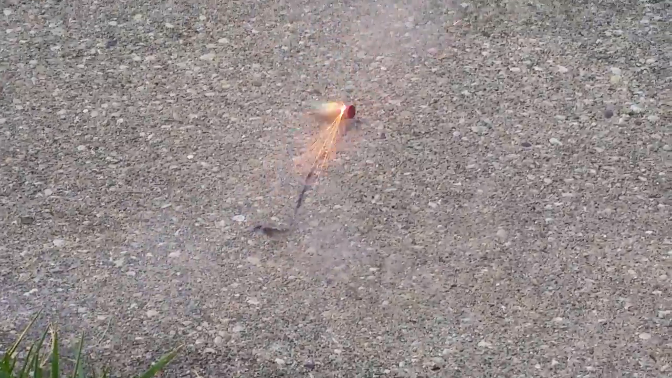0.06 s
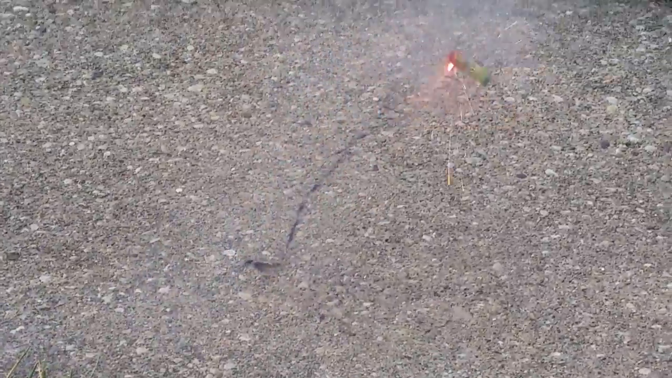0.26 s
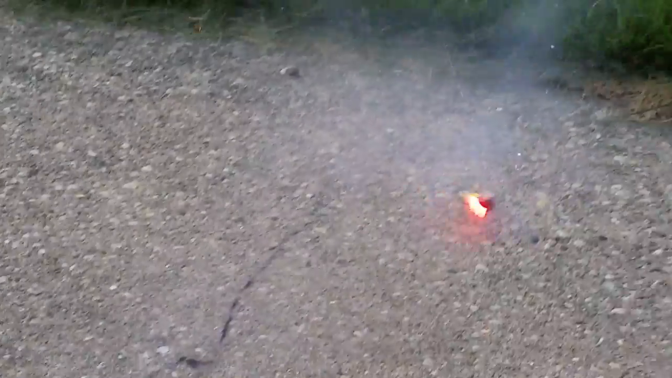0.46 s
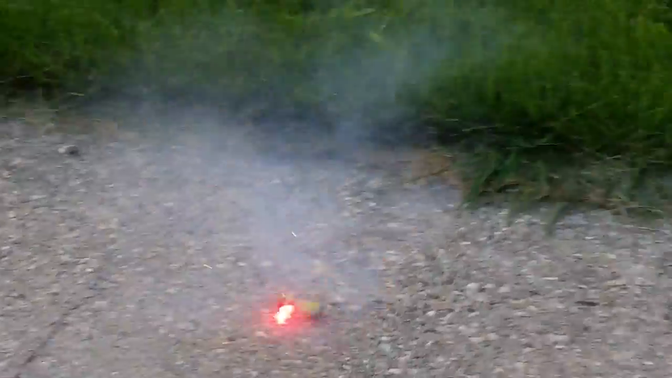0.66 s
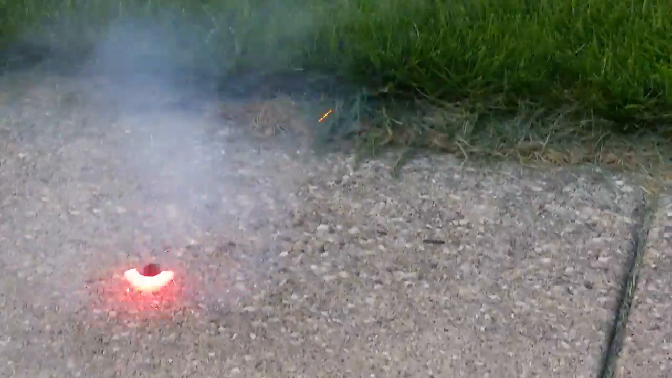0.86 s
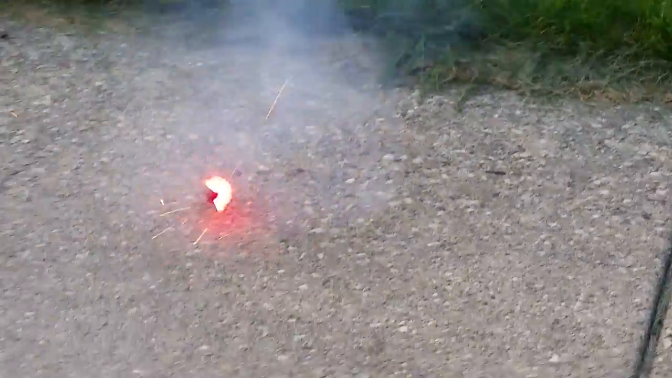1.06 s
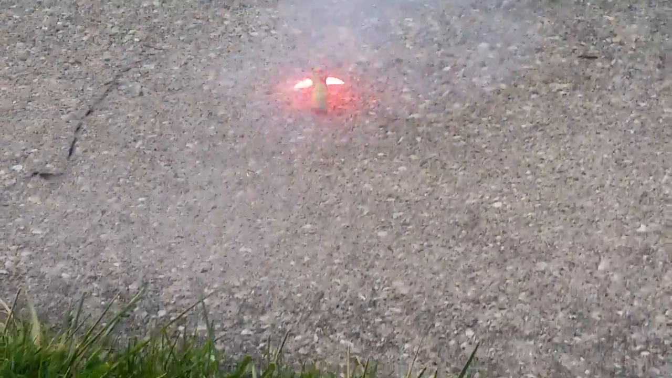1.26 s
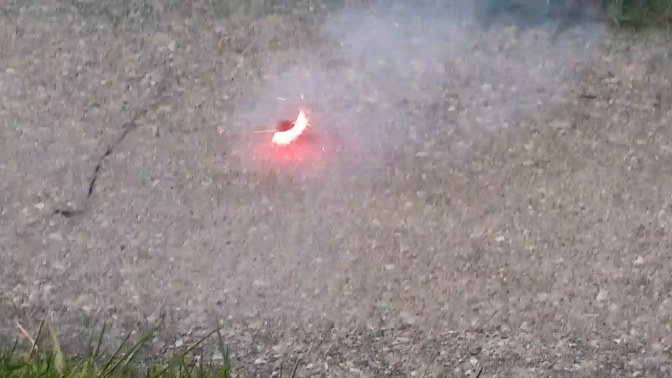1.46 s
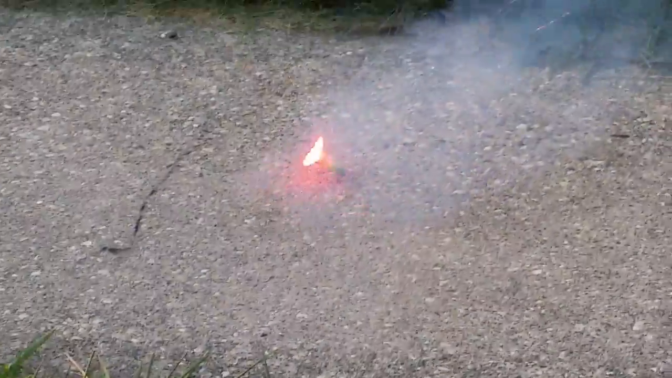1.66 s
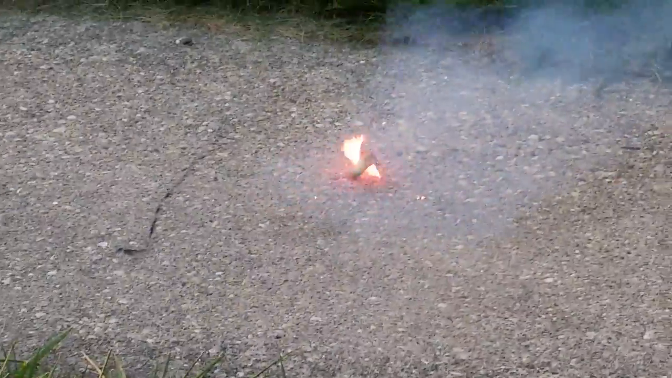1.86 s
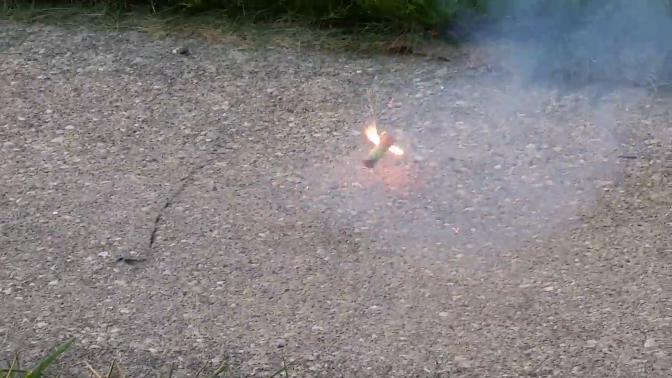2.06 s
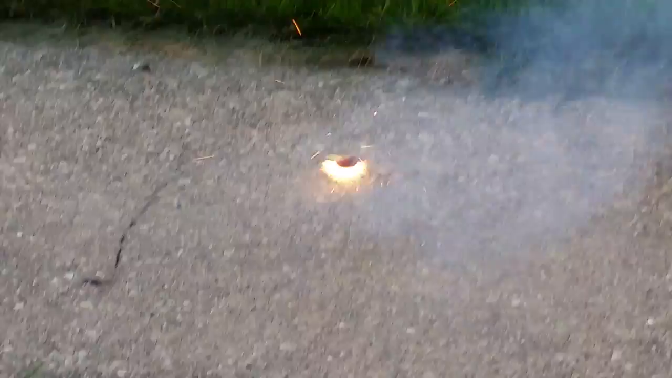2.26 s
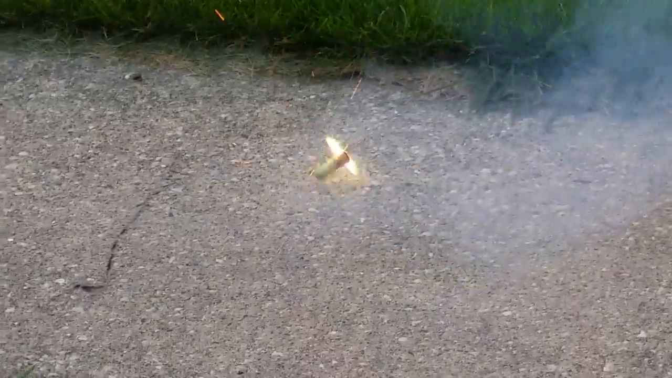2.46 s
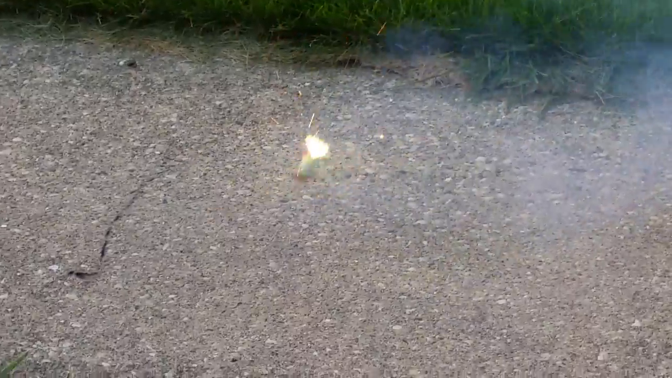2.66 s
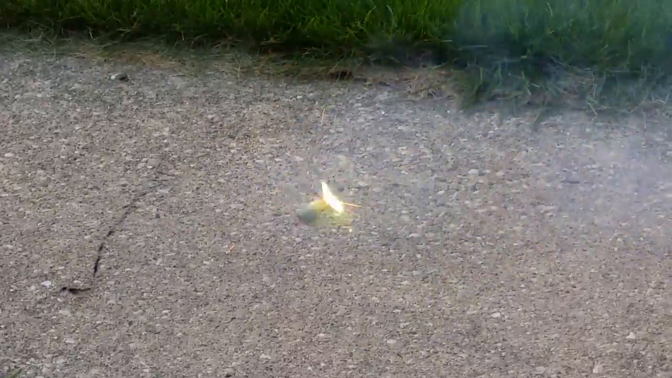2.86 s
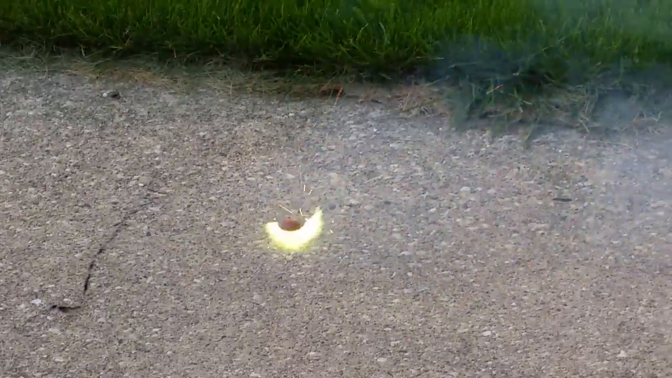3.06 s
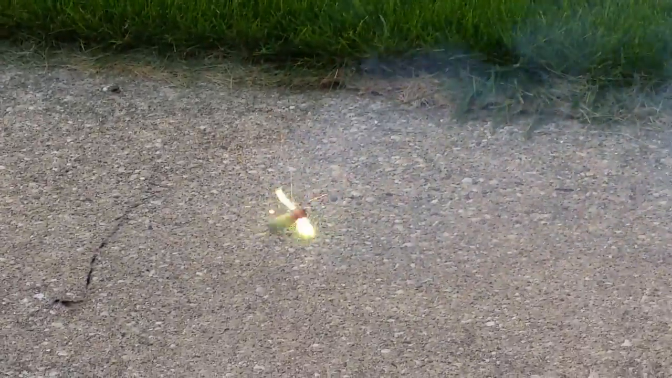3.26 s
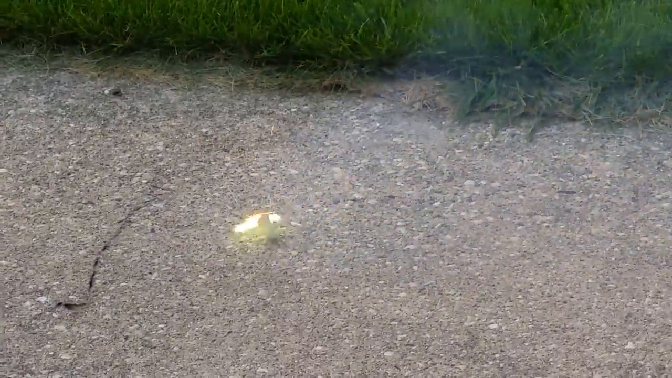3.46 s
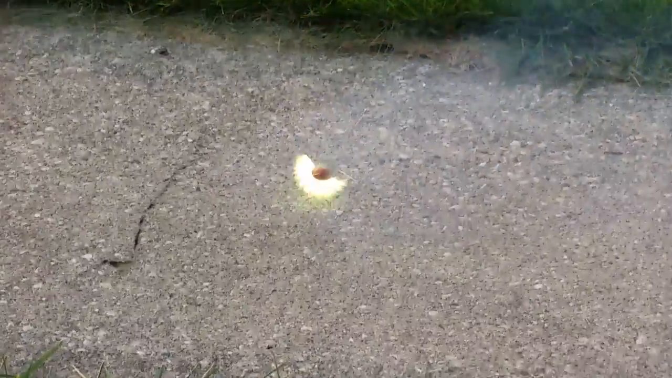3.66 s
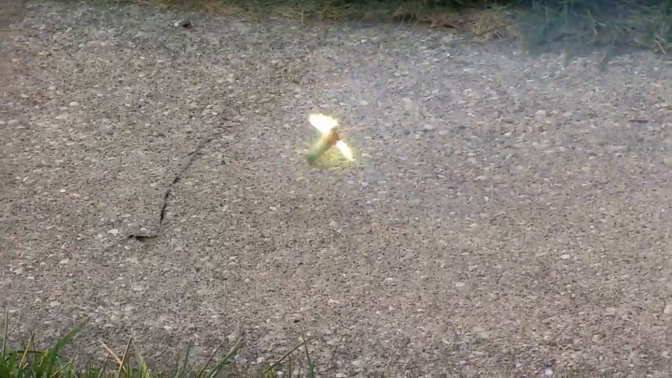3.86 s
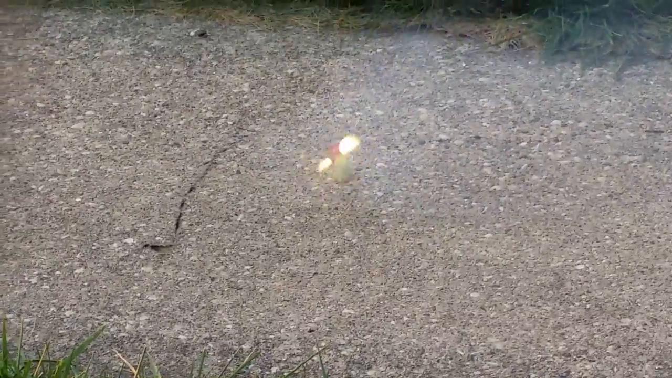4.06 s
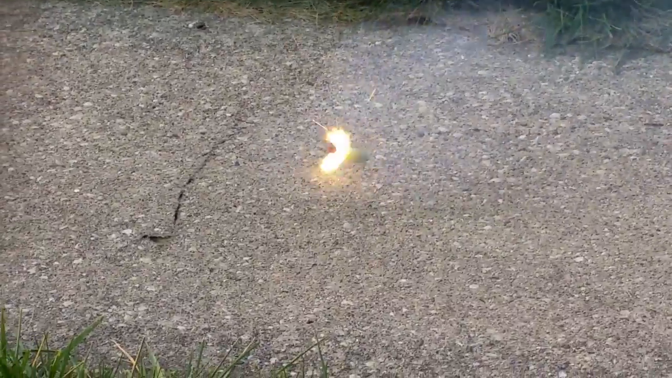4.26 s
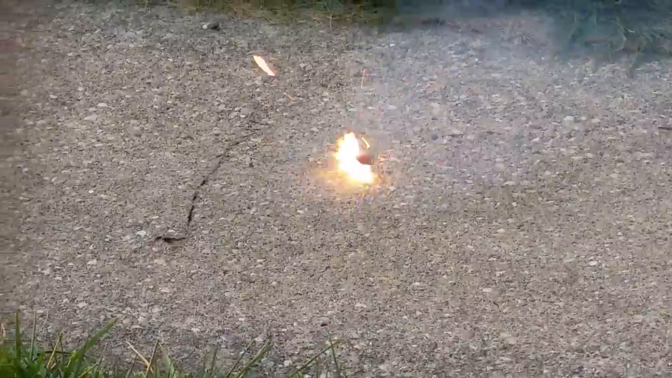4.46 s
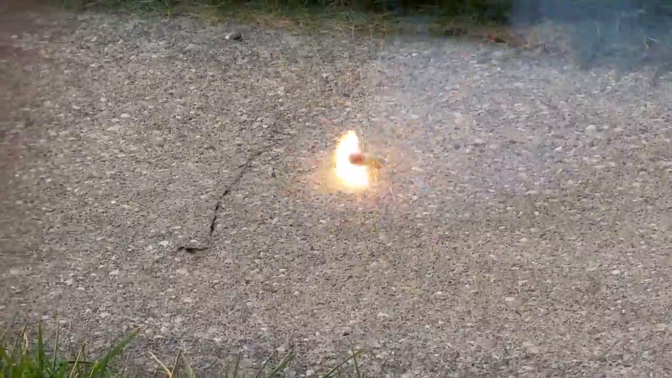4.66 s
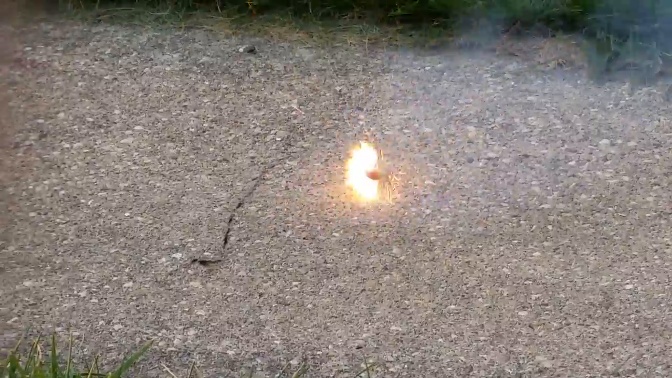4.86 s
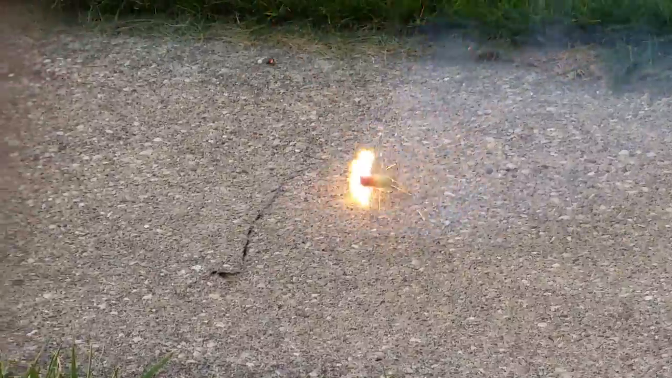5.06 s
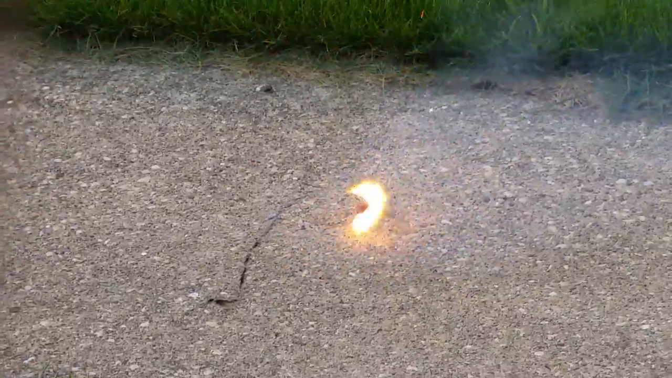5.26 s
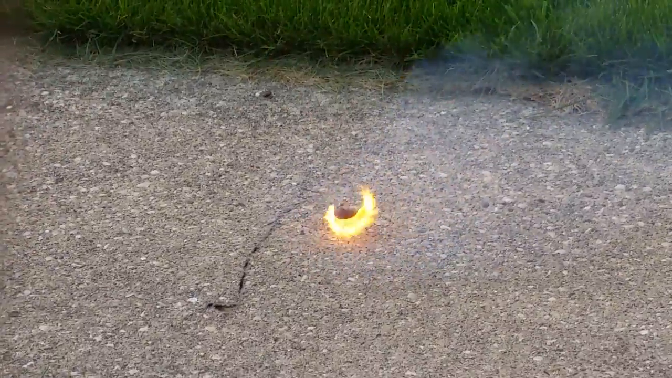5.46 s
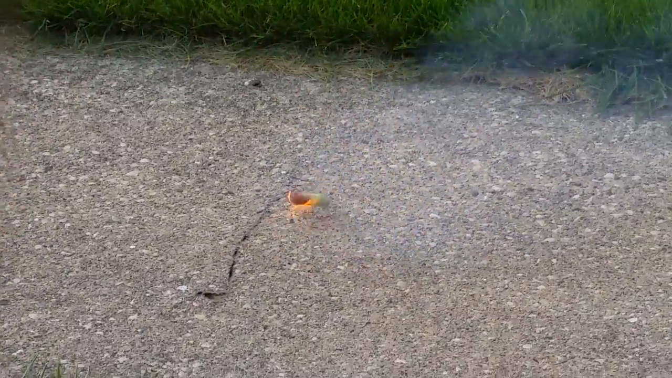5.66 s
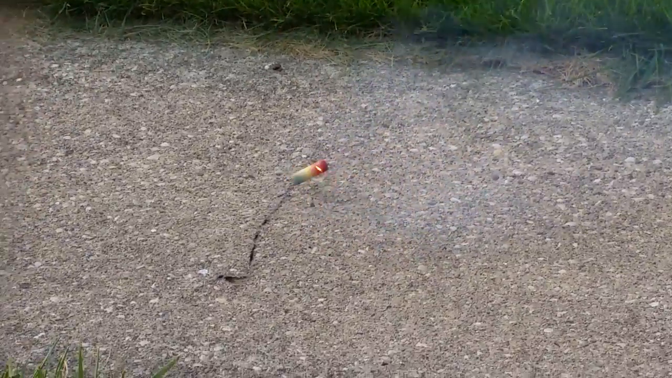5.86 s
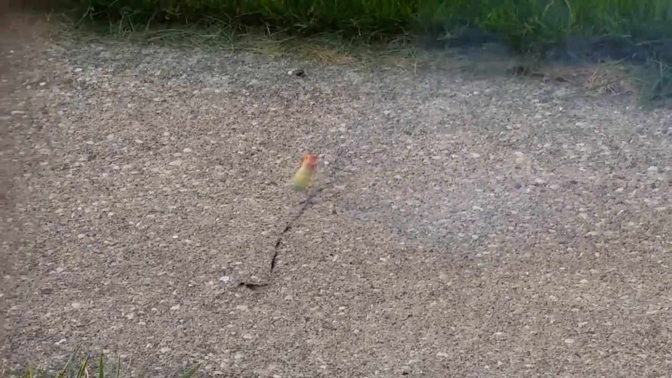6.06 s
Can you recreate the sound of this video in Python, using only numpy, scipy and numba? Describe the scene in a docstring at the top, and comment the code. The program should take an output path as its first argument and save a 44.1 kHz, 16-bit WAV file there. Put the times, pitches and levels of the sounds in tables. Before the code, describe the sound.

Bright, dense gas hiss with spluttering start, rapid spinning flutter and sharp spark pops outdoors, dying abruptly into faint quiet air.

```python
"""A small ground firework spins on a concrete path a few metres from a hand-held stereo camera.
Its gas jet is shaped noise that roars and hisses, throbbing as the nozzle sweeps round, and it sputters out.
The spin hums in sine tones, sparks pop as short push-pull waves, and the case thumps the ground in low tones.
Grit knocks on the camera, over low flame rumble and quiet outdoor air, both made of coloured noise.
The camera's two microphone ports colour left and right very differently in the treble."""
import sys
import numpy as np
from scipy import signal
from scipy.fft import rfft, irfft, next_fast_len
from scipy.io import wavfile
from scipy.ndimage import uniform_filter1d, map_coordinates
from numba import njit

SR = 44100
rng = np.random.default_rng(int(sys.argv[2]) if len(sys.argv) > 2 else 0)


def file_out(sig):
    """Save sig as 16-bit WAV at sys.argv[1]."""
    # one column per channel
    cols = np.atleast_2d(sig).T
    # limit, then scale
    lim = np.clip(cols, -1, 1)
    pcm = np.round(lim * 32767).astype(np.int16)
    wavfile.write(sys.argv[1], SR, pcm)


N = 269010
T = np.arange(N) / SR  # time of each sample, in s
SIZE = next_fast_len(N + 4096)  # room for filters to ring out
HZ = np.arange(SIZE // 2 + 1) * SR / SIZE + 1e-3  # just above 0, so that its log exists

# how strongly each layer of the jet throbs with the spin:
# (multiple of the spin [count], roar [dB], fizz [dB], hiss [dB])
THROB = [(1, 0.5, 1.06, 0.58), (2, 0.44, 0.9, 0.7), (3, 1.5, 2.5, -1.5), (4, 1.5, 0.8, 1.93)]
# how the jet burns: (time [s], hiss [dB], fizz [dB], roar [dB], shared part of the thin top [dB])
BURN = [(0.0, -21, -28, -26.5, -25), (.08, -23.5, -35, -29.5, -27), (.18, -19, -30, -25.5, -28),
        (.36, -21, -34, -28.5, -27), (.385, -22, -36, -34.5, -25), (.52, -22.5, -40.5, -35, -22),
        (.68, -23.5, -37, -31.5, -25.5), (.8, -24, -32, -32, -28), (.95, -23, -29.5, -28.5, -24),
        (1.05, -22.5, -30, -28.5, -22), (1.2, -21.5, -31.5, -30.5, -23), (1.4, -19, -28, -27.5, -29),
        (1.7, -20.5, -34, -30.5, -29), (2.0, -20, -29, -29, -28), (2.7, -20.5, -32.5, -30, -27.5),
        (3.2, -20.5, -28, -30.5, -26.5), (3.65, -21.5, -28.5, -29.5, -27.5), (3.85, -20, -31.5, -33, -27),
        (4.5, -20.5, -31, -33, -27), (4.9, -20, -30.5, -32, -26), (5.2, -19.5, -30.5, -31.5, -24),
        (5.5, -22, -36, -38, -26.5), (5.62, -24, -38, -34.5, -29), (5.78, -27, -37, -36, -33),
        (5.81, -29, -42, -43, -31), (5.87, -31, -45, -49, -37), (5.95, -34.5, -48.5, -50, -43),
        (6.1, -46, -56, -55.5, -55)]
# where body, peak, fizz, hiss and thin top meet: four edges [Hz]
LAYER_EDGES_HZ = (2350, 4150, 7500, 12900)
# colour of the roar's body: (pitch [Hz], level [dB])
BODY_COLOUR = [(200, 0), (320, 3.5), (450, -4), (620, 6.5), (800, 3.5), (1050, -3), (1280, 3), (1600, -2),
               (2300, -1)]
# sudden spits of gas while it catches and as it dies: (time [s], level [dB], rise [s])
SPITS = [(.001, -30, 0.0027), (.01, -18, 0.0042), (.048, -24, 0.0025), (.087, -30, .002),
         (.057, -18.5, 0.0025), (.117, -16.5, 0.0014), (0.133, -24, 0.0019), (.141, -28, .0015),
         (.154, -21, .0015), (.159, -20.5, 0.0024), (.168, -30, 0.0034), (.187, -23, 0.0027),
         (.193, -20, 0.0029), (0.22, -18, 0.0017), (.202, -25, .002), (.226, -22, .001), (.243, -28, .002),
         (.252, -31, 0.0015), (.269, -18.5, 0.004), (.279, -25, .002), (0.289, -25, 0.002),
         (.303, -28, .002), (0.32, -20, 0.0012), (.341, -19.5, 0.0032), (.358, -29, 0.0044),
         (0.373, -33, 0.0029), (.395, -36, 0.0023), (5.756, -35, 0.0014), (5.765, -37, .0016),
         (5.774, -35, .0014), (5.783, -37, 0.0016), (5.792, -35.5, 0.0016), (5.806, -33, 0.00092),
         (5.817, -32, 0.0013), (5.827, -34, 0.0012), (5.841, -39, 0.0018), (5.858, -40, .001),
         (5.898, -45, .001), (5.909, -49, 0.00097)]
# lean to the left as the camera follows the firework: (time [s], fizz [dB], hiss [dB])
LEAN = [(0, -5, .5), (.15, -4, 0.5), (.52, 2.5, -1), (1.02, -6, 5.5), (1.5, -1.5, -1), (1.65, -2, 1),
        (2.14, 0.5, -1), (2.4, -2.5, -1), (2.75, -1, 0), (3.58, 2.5, 3), (3.75, 2, 0.5), (4.47, 2, -1),
        (5.72, 0, 1), (6.1, 2, 2)]
# the thin top that the ports hear in opposition, against the hiss: (time [s], level [dB])
THIN_APART = [(0, -9.5), (.35, -9.5), (.52, -12), (.7, -9), (.9, -9), (1.05, -14), (1.2, -14), (1.35, -9.5),
              (2.2, -8.5), (2.7, -10.5), (3.2, -8.5), (4.2, -10), (6.1, -9.5)]
# colour of the thin top: (pitch [Hz], shared part [dB], lift at the right port [dB])
THIN_COLOUR = [(12500, 1, 0), (13300, 4.5, 0), (14000, 2.5, 0), (14600, -1.5, 1), (15300, -4, 4),
               (16000, -6, 3)]
# speed of the spin and loudness of its hum:
# (time [s], spin [turns per s], fourth multiple [dB], third and sixth multiples [dB])
SPIN = [(.3, 20.3, -58, -62), (.85, 23.5, -55, -51), (1.05, 25.5, -55, -47), (1.3, 27.6, -52, -49),
        (1.5, 28.8, -49, -58), (1.75, 32.2, -48, -57), (2.0, 31.4, -48, -57), (2.26, 31.2, -46, -54),
        (2.66, 33.8, -45, -53), (3.1, 35.6, -45.5, -54), (3.6, 38.5, -44.5, -52), (4.0, 39, -45.5, -55),
        (4.65, 38.9, -47, -58), (4.8, 39.4, -45.5, -49), (5.04, 39.8, -44, -49), (5.3, 40.7, -45.5, -58),
        (5.62, 39.6, -47.5, -69), (5.72, 39, -58, -72), (5.9, 38, -62, -75)]
# hum an octave under the fourth multiple: (time [s], level [dB])
LOW_HUM = [(2.5, -66), (2.8, -54), (3.6, -54), (4.3, -56), (4.6, -64), (5.4, -68), (5.7, -80)]
# third and sixth multiples of the spin, which come forward near 1 s: [count]
SIDE_HUM = (3, 6)
# level of the third and of the sixth multiple, added to their shared column of SPIN: [dB]
SIDE_HUM_DB = (-1.5, -4)
# sparks that pop: (time [s], level [dB], pitch [Hz])
POPS = [(.491, -14.5, 400), (0.829, -25, 393), (.959, -29.5, 350), (1.142, -26, 610), (2.334, -22, 453),
        (2.792, -21, 346), (3.464, -23, 350), (3.739, -25, 701), (4.172, -23.5, 400), (4.267, -27, 600),
        (4.602, -23, 605), (5.008, -24, 347.5), (5.140, -40, 700), (5.844, -29, 387)]
# the spinning case thumps the concrete: (time [s], level [dB], pitch [Hz])
THUMPS = [(0.673, -33, 151), (0.82, -30, 91.5), (1.043, -33, 143), (1.441, -33, 116), (1.721, -36, 124),
          (1.843, -36, 132), (2.286, -34, 215), (2.434, -33.5, 118), (2.775, -36, 150), (2.924, -33, 207),
          (3.022, -37, 160), (3.452, -32, 240), (3.609, -35, 161), (4.161, -35, 170)]
# grit that strikes the camera by its left port:
# (time [s], level [dB], pitch [Hz], fall [cycles], ring against the knock [dB])
STRIKES = [(2.45, -19.5, 300, 0.36, -37), (3.6622, -7, 800, 0.81, -15)]
# the flame's low sounds: (time [s], rumble [dB], deep buffeting of the air [dB])
FLAME = [(0, -40, -52), (.3, -38.5, -56), (.5, -44.5, -60), (.83, -42, -58), (1.1, -41.5, -56),
         (1.5, -45.5, -56), (2.2, -42, -50), (2.9, -42.5, -56), (3.7, -42, -56), (4.1, -44, -60),
         (4.6, -45, -60), (5.4, -50.5, -68), (5.7, -43, -64), (5.85, -49, -62), (6.1, -55, -62)]
# colour of the rumble: (pitch [Hz], level [dB per Hz])
RUMBLE_COLOUR = [(30, -23), (70, -2.5), (120, 0.5), (200, -4), (300, -6.5), (500, -21.5)]
# colour of the deep buffeting: (pitch [Hz], level [dB per Hz])
DEEP_COLOUR = [(20, -14), (40, -7), (65, 1), (95, -20), (200, -60)]
# colour of the outdoor air: (pitch [Hz], level [dB per Hz])
AIR_COLOUR = [(18, -47), (30, -24), (87, 5), (151, -22), (347, -4), (404, -23), (3000, -43), (3900, -66),
              (6600, -120)]
# camera ports: (pitch [Hz], left [dB], right [dB], left leads by [radians], likeness [0-1])
PORTS = [(60, -10.5, -10, 0, 0.91), (760, -6, -5, -0.1, 0.98), (1820, 0, 3, 0.35, 0.87),
         (2460, -4, -3, 0.5, 0.9), (3154, 1, 6.5, -0.8, 0.88), (3740, -2.5, -2, 1.35, 1),
         (5100, 6.5, 0.5, 1.1, 0.7), (5600, 4.5, -0.5, 1.8, 0.7), (6300, 6.5, -2, 3.2, .7),
         (7000, 6, 1.5, 4.5, 0.7), (7870, 7, 12, 4.5, 0.5), (9200, 3, 20.5, 5, 0.94),
         (10580, 0.5, 17.5, 3.5, 0.66), (12380, 9, 15, 3.5, 0.75), (12800, 7.5, 14, 3, 0.98),
         (14000, 5, 8, 3.6, 0.94), (14900, 3.5, 3.5, 4, 0.9), (15600, 3, 4, 4.3, 0.9),
         (16000, 1.5, 1, 4.5, 0.88)]
# quick reflections off hand and camera body: (delay [ms], left share [ratio], right share [ratio])
BOUNCES = [(1.356, 0.24, 0.025), (1.659, -0.28, -0.14), (1.818, 0.15, 0.027)]
# reflections off the hand and body of the swaying camera:
# (time [s], left delay [ms], left share [ratio], right delay [ms], right share [ratio])
HAND = [(0, 1.4, 0, .47, -.2), (.3, 1.4, 0, 0.5, -.12), (.45, 1.4, 0, .49, 0), (.6, 1.4, -.08, .49, -.15),
        (.78, 1.39, -.08, .468, -.25), (1.0, 1.39, 0, 0.43, -.33), (1.25, 1.9, -.05, 0.44, -0.13),
        (1.5, 1.5, -.05, 0.5, -.13), (1.85, 1.39, -.05, .47, -0.15), (2.2, 1.38, -0.19, 0.47, -.15),
        (2.6, 1.39, -0.045, .45, -.08), (3.0, 1.5, -.05, .45, -0.072), (3.25, 1.39, -0.029, .455, -.17),
        (3.7, 1.34, -.08, 0.458, -.1), (3.88, 1.14, -.33, 0.44, -.03), (4.2, 1.205, -0.19, .46, -0.13),
        (4.9, 1.05, -.25, 0.48, -.08), (5.2, 1.23, -.05, .46, -0.072), (5.55, 1.2, -.22, 0.46, -.08),
        (6.1, 1, -0.19, 0.46, -.1)]
# a later reflection at the left port once the camera has turned: (time [s], share [ratio])
LATE = [(2.2, 0.0063), (2.4, -.2), (3.7, -0.17), (3.9, -0.036), (4.1, -.15), (4.7, -.12), (5.0, -0.051),
        (5.3, -.18), (6.1, -.08)]
# the camera body shades the right port; the hollow moves as it turns:
# (time [s], centre [Hz], depth [0-1])
HOLLOW = [(0, 6000, .3), (.3, 5800, .4), (.4, 5500, .7), (.52, 5200, 1), (.65, 5500, .9), (.78, 5600, .5),
          (1.0, 5500, .35), (1.25, 5700, .35), (1.5, 5300, 0.5), (2.0, 5700, 0.45), (2.5, 6300, 0.3),
          (3.1, 6300, 0.5), (3.5, 6600, 0.7), (3.9, 6700, 0.7), (5.0, 6500, .8), (6.1, 6800, .7)]
# narrow notches in each port that slide as the camera turns:
# (time [s], right centre [Hz], right depth [0-1], left centre [Hz], left depth [0-1])
NOTCH = [(0, 13200, .4, 9000, .4), (.3, 13000, .3, 9000, .3), (.42, 11900, .4, 9200, .95),
         (.7, 12400, .65, 9200, .95), (.9, 13500, .65, 9000, .4), (1.1, 13500, .7, 9000, .2),
         (1.3, 12900, .7, 9000, .75), (1.55, 12700, .35, 8900, .8), (2.0, 12400, .4, 9100, .5),
         (2.5, 13000, .3, 9700, .4), (3.2, 13300, .15, 9300, .5), (3.65, 13300, .1, 9000, .45),
         (3.85, 13200, .3, 8900, .8), (4.6, 13200, .3, 9000, .5), (5.3, 13200, .2, 9000, .3),
         (5.6, 13200, .3, 9000, .7)]

SURGE_DB, SURGES_PER_S = 1.06, 18  # the burn surges and sags
SURGE_SETTLES_S, HISS_SURGE = 0.31, 0.37  # it evens out over this time; share of it in hiss and fizz
BODY_DB = -8  # low body of the roar against its whistling peak
UNEVEN_DB = 1.3  # scale of the roar's unevenness
FIZZ_SWAY_DB = 1.65  # the fizz also sways quickly from side to side
# roar's peak and spits sound narrow at first, wide after about 2.4 s
WIDENS_S, WIDENS_OVER_S, NARROW_DB, WIDE_DB = 2.43, 0.09, -8, 2
SPIT_BODY_DB, SPIT_BODY_SLOPE = -15.5, 0.55  # body of a spit in dB = this + slope x its level
SPIT_TOP_HZ = 3900
# a low gurgle as the charge runs out
GURGLE_S, GURGLE_WIDTH_S, GURGLE_DB, GURGLE_LOW_HZ, GURGLE_HIGH_HZ = 5.735, 0.08, -37, 250, 990
CRACKLES_PER_S, CRACKLE_FALL_S = 250, .0006  # grains of powder that flare in the jet
FOURTH, HUM_FADE_IN_S = 4, 0.39  # multiple of the spin; rise of the hum
CRACK_DB = -0.5  # crack of a pop against its push
THUMP_RISE_S, THUMP_FALL_S = 0.0028, 0.0078
RING_LATE_S, RING_S = 0.0093, .0055  # the struck shell rings on a moment later
STRIKE_RISE_CYCLES, FAR_PORT_DB, FAR_PORT_MS = 0.36, -12, 0.61
RUMBLE_THROB_DB = 2.5  # once a turn
AIR_DB = -56.5
GROUND_MS, GROUND_DRIFT_MS = 0.2282, .003  # delay off the path under the jet, and its wander
LATE_MS = 1.66
HOLLOW_WIDTH_HZ, RIGHT_NOTCH_WIDTH_HZ, LEFT_NOTCH_WIDTH_HZ = 1440., 1100., 1200.
TOP_HZ = 15750
LEFT_ONLY = np.array([[1], [0]])
OPPOSED = np.array([[1], [-1]])  # plus on the left, minus on the right


def jet(turn):
    """Rushing gas as noise in ranges of pitch; they surge together, throb with the spin, flicker alone."""
    hiss_db, fizz_db, roar_db, top_db = curves(BURN)
    surge = walk(SURGES_PER_S)
    surge_db = SURGE_DB * unit(surge - uniform_filter1d(surge, int(SURGE_SETTLES_S * SR)))
    hiss_db = hiss_db + HISS_SURGE * surge_db
    fizz_db = fizz_db + HISS_SURGE * surge_db
    roar_db = roar_db + surge_db

    ports = port_gains()
    waves = [np.cos(row[0] * (turn + 0.37 * walk(6.5))) for row in THROB]
    roar_throb, fizz_throb, hiss_throb = np.array(THROB)[:, 1:].T @ waves
    slow, quick, flare = walk(35), walk(160), crackle()
    uneven = 0.19 * slow + 0.22 * quick + 0.62 * walk(300) + .3 * flare
    roar_flutter = roar_throb + UNEVEN_DB * uneven
    fizz_flutter = fizz_throb + 0.9 * slow + 0.4 * quick + .6 * flare
    hiss_flutter = hiss_throb + 0.9 * slow + 0.17 * quick + 0.9 * walk(700) + 1.5 * flare

    front = roar_peak(roar_db, roar_flutter, flare, ports) + spits(flare, ports)
    body = roar_body(roar_db, roar_flutter, ports) + gurgle(ports)
    treble = fizz(fizz_db, fizz_flutter, ports) + hiss(hiss_db, hiss_flutter, ports)
    treble = treble + thin_top(top_db, hiss_db, hiss_flutter, ports)
    return widened(front) + body + shaded(reflected(treble))


def roar_peak(level_db, flutter_db, flare, ports):
    """The whistling peak of the roar is a band of fluttering noise."""
    neck, mid = LAYER_EDGES_HZ[:2]
    return undb(level_db) * gas(flutter_db + 1.1 * walk(60) + .5 * flare, band(neck, mid), ports)


def roar_body(level_db, flutter_db, ports):
    """The fuller part of the roar is noise below its peak."""
    return undb(level_db + BODY_DB) * gas(flutter_db + 0.89 * walk(70), body_gain(), ports)


def body_gain():
    """Gain per frequency of the roar's body."""
    return band(100, LAYER_EDGES_HZ[0]) * undb(over_hz(BODY_COLOUR)[0])


def fizz(level_db, flutter_db, ports):
    """Fizzing gas is noise above the roar, leaning and swaying from side to side."""
    mid, high = LAYER_EDGES_HZ[1:3]
    lean_db = curves(LEAN)[0] + FIZZ_SWAY_DB * walk(12)
    noise = gas(flutter_db + 1.1 * walk(90), band(mid, high), ports)
    return noise * undb(level_db + OPPOSED / 2 * lean_db)


def hiss(level_db, flutter_db, ports):
    """Hissing gas is noise above the fizz; its left side grows and fades with the lean."""
    high, top = LAYER_EDGES_HZ[2:]
    lean_db = curves(LEAN)[1]
    noise = gas(flutter_db + 0.21 * walk(60), band(high, top), ports)
    return noise * undb(level_db + LEFT_ONLY * lean_db)


def thin_top(shared_level_db, hiss_db, flutter_db, ports):
    """The thinnest noise: the ports nearly oppose each other and cancel more or less as the camera turns."""
    left, right = gas(flutter_db + 1.1 * walk(70), band(LAYER_EDGES_HZ[3], SR / 2, order=16), ports)
    colour_db, lift_db = over_hz(THIN_COLOUR)
    shared = undb(shared_level_db) * shaped(left + right, undb(colour_db))
    apart = undb(hiss_db + curves(THIN_APART)[0]) * (left - right)
    thin = shared + OPPOSED * apart
    thin[1] = shaped(thin[1], undb(lift_db))
    return thin


def spits(flare, ports):
    """Sudden spits of gas are bursts of noise with a peak and a body, quick to rise and soon gone."""
    peak_bumps, body_bumps = np.zeros(N), np.zeros(N)
    for s, db, rise_s in SPITS:
        start = int(s * SR)
        age = np.arange(2000) / SR / rise_s
        bump = age * np.exp(1 - age)  # reaches 1 after the rise time
        peak_bumps[start:start + 2000] += undb(db) * bump
        # the body grows more slowly than the peak
        body_bumps[start:start + 2000] += undb(SPIT_BODY_DB + SPIT_BODY_SLOPE * db) * bump
    grit_db = 1.4 * walk(460) + .7 * flare
    peak_range = band(LAYER_EDGES_HZ[0], SR / 2) * band(1, SPIT_TOP_HZ, order=16)
    body_range = body_gain() * band(150, 1900, order=1)
    return peak_bumps * gas(grit_db, peak_range, ports) + body_bumps * gas(grit_db, body_range, ports)


def gurgle(ports):
    """As the charge runs out, low noise swells briefly and flutters unevenly."""
    swell = undb(GURGLE_DB) * np.exp(-((T - GURGLE_S) / GURGLE_WIDTH_S) ** 4)
    return swell * gas(3.1 * walk(120), band(GURGLE_LOW_HZ, GURGLE_HIGH_HZ, order=2), ports)


def crackle():
    """Grains of powder flare at random: random size, sudden rise and quick fall; spread 1."""
    flares = (rng.random(N) < CRACKLES_PER_S / SR) * (.4 + rng.random(N))
    keep = np.exp(-1 / (CRACKLE_FALL_S * SR))
    flares = signal.lfilter([1], [1, -keep], uniform_filter1d(flares, size=5))
    return unit(flares - flares.mean())


def gas(flutter_db, passed, ports):
    """Turbulent noise in one range of pitch, its loudness fluttering around a steady mean."""
    flutter = undb(flutter_db)
    flutter = flutter / np.sqrt(uniform_filter1d(flutter ** 2, SR // 14))
    noise = rfft(rng.standard_normal((3, N)) * flutter, SIZE)
    alike, alone = ports
    heard = alike * noise[0] + alone * noise[1:]
    return unit(irfft(heard * passed, SIZE)[:, :N])


def hum(turn, fourth_db, side_db):
    """The sweeping flame pumps the air at multiples of the spin."""
    lines = [(FOURTH, fourth_db), (FOURTH / 2, curves(LOW_HUM)[0])]
    lines += [(multiple, side_db + db) for multiple, db in zip(SIDE_HUM, SIDE_HUM_DB)]
    tones = np.zeros(N)
    for multiple, db in lines:
        tones += undb(db + 1.1 * walk(12)) * np.sin(multiple * turn + 0.3 * walk(6))
    fade_in = np.clip((T - SPIN[0][0]) / HUM_FADE_IN_S, 0, 1)
    return np.sqrt(2) * tones * fade_in  # sqrt 2: table levels are rms


def pops(cycles=0.22):
    """Each pop is a push and a pull of air about one cycle long, with a brighter crack."""
    out = np.zeros(N)
    age = np.arange(-200, 200) / SR
    crack = np.sin(2 * np.pi * 2300 * age) * np.exp(-(age / 0.00031) ** 2)
    for s, db, hz in POPS:
        push = -np.sin(2 * np.pi * hz * age) * np.exp(-(hz * age / cycles) ** 2)
        start = int(s * SR) - 200
        out[start:start + len(age)] += undb(db) * (push - undb(CRACK_DB) * crack)
    bounces = sum((a + b) / 2 * np.roll(out, int(ms * SR / 1000)) for ms, a, b in BOUNCES)
    return out + bounces


def thumps():
    """The case hits the ground: dull low knocks, quick to rise and dying away."""
    out, age = np.zeros(N), np.arange(3000) / SR
    shape = (1 - np.exp(-age / THUMP_RISE_S)) * np.exp(-age / THUMP_FALL_S)
    shape = shape / shape.max()
    for s, db, hz in THUMPS:
        out[int(s * SR):][:len(age)] += undb(db) * shape * np.sin(2 * np.pi * hz * age)
    return out


def strikes():
    """Grit gives a short knock and a ring, loud in the near port, weaker and later in the far one."""
    near = np.zeros(N)
    age = np.arange(-200, 1200) / SR
    ring = np.exp(-((age - RING_LATE_S) / RING_S) ** 4)
    for s, db, hz, fall_cycles, ring_db in STRIKES:
        start = int(s * SR) - 200
        knock = np.exp(-(hz * age / np.where(age < 0, STRIKE_RISE_CYCLES, fall_cycles)) ** 2)
        strike = np.cos(2 * np.pi * hz * age) * (knock + undb(ring_db) * ring)
        near[start:start + len(age)] -= undb(db) * strike
    far = undb(FAR_PORT_DB) * np.roll(near, int(FAR_PORT_MS * SR / 1000))
    return np.array([near, far])


def rumble(turn):
    """The flame's rumble, fluttering with the spin, and a deeper buffeting under it."""
    flame_db, deep_db = curves(FLAME)
    flame_db = flame_db + RUMBLE_THROB_DB * np.cos(turn) + 2.4 * walk(29.86)
    deep_db = deep_db + 2.1 * walk(8)
    return undb(flame_db) * lows(RUMBLE_COLOUR, -17) + undb(deep_db) * lows(DEEP_COLOUR, -8)


def air():
    """Quiet outdoor air is steady, mostly low noise."""
    return undb(AIR_DB) * lows(AIR_COLOUR, -21)


def lows(colour, side_db):
    """Bass noise of a given colour, nearly the same on both sides."""
    mid, side = shaped(rng.standard_normal((2, N)), undb(over_hz(colour)[0]))
    return unit(mid + undb(side_db) * side * OPPOSED)


def port_gains():
    """Gain per frequency of each port for sound both hear alike and for sound each hears alone."""
    left_db, right_db, lead, like = over_hz(PORTS)
    colour = undb([left_db, right_db]) * np.exp(.5j * OPPOSED * lead)
    bounce = sum(np.array([[a], [b]]) * np.exp(-2j * np.pi * HZ * ms / 1000) for ms, a, b in BOUNCES)
    bounce = 1 + bounce * band(1, 5600, order=2)  # the soft hand swallows the treble
    return np.sqrt(like) * colour * bounce, np.sqrt(1 - like) * colour


def widened(front):
    """The stereo width of the roar's peak and spits grows."""
    opened = (1 + np.tanh((T - WIDENS_S) / WIDENS_OVER_S)) / 2
    width_db = NARROW_DB + (WIDE_DB - NARROW_DB) * opened
    middle = front.mean(axis=0)
    return middle + undb(width_db) * (front - middle)


def reflected(treble):
    """The path, the hand and the camera body send back delayed copies of the treble."""
    ground_ms = GROUND_MS + GROUND_DRIFT_MS * walk(2.6)
    treble = echo(treble, [ground_ms] * 2, (-.15, -.35))  # minus: upside down
    left_ms, left_share, right_ms, right_share = curves(HAND)
    treble = echo(treble, (left_ms, right_ms), (left_share, right_share))
    treble[0] += curves(LATE)[0] * np.roll(treble[0], int(LATE_MS * SR / 1000))
    return treble


def shaded(treble):
    """The camera body hollows out the right port, and a sliding notch thins each port."""
    left, right = treble
    hollow_hz, hollow_depth = curves(HOLLOW)
    right_hz, right_depth, left_hz, left_depth = curves(NOTCH)
    right = dip(right, hollow_hz, HOLLOW_WIDTH_HZ, hollow_depth)
    right = dip(right, right_hz, RIGHT_NOTCH_WIDTH_HZ, right_depth)
    left = dip(left, left_hz, LEFT_NOTCH_WIDTH_HZ, left_depth)
    return np.array([left, right])


def echo(x, delay_ms, share):
    """Adds to each side a copy read from a moving place in the past."""
    copies = []
    for side, ms, gain in zip(x, delay_ms, share):
        place = np.arange(N) - ms * SR / 1000
        copies.append(gain * map_coordinates(side, [place], order=3))
    return x + np.array(copies)


@njit
def dip(x, hz, width_hz, depth):
    """Takes a share out of a moving band, found by a two-memory band filter."""
    y, band_memory, low_memory = np.empty(len(x)), 0., 0.
    for i in range(len(x)):
        g, k = np.tan(np.pi * hz[i] / SR), width_hz / hz[i]
        v = (band_memory + g * (x[i] - low_memory)) / (1 + g * (g + k))
        band_memory = 2 * v - band_memory
        low_memory = low_memory + 2 * g * v
        y[i] = x[i] - depth[i] * k * v
    return y


def undb(db):
    """Gain of a level in dB."""
    return 10 ** (np.asarray(db) / 20)


def curves(table):
    """Columns of a table joined by straight lines in time."""
    s, *columns = np.transpose(table)
    return [np.interp(T, s, c) for c in columns]


def over_hz(table):
    """Columns of a table joined by straight lines on a log-frequency axis."""
    hz, *columns = np.transpose(table)
    return [np.interp(np.log(HZ), np.log(hz), c) for c in columns]


def shaped(x, gain):
    """Filter by a gain per frequency."""
    return irfft(rfft(x, SIZE) * gain, SIZE)[..., :N]


def band(lo_hz, hi_hz, order=8):
    """Gain of a pass band with soft edges."""
    return 1 / np.sqrt((1 + (lo_hz / HZ) ** (2 * order)) * (1 + (HZ / hi_hz) ** (2 * order)))


def walk(rate):
    """Random levels, rate of them per second, smoothed twice into a wandering curve; spread 1."""
    hold = int(SR / rate)
    steps = np.repeat(rng.standard_normal(N // hold + 1), hold)
    smooth = uniform_filter1d(uniform_filter1d(steps, hold), hold)[:N]
    return smooth / smooth.std()


def unit(x):
    """Scaled to rms 1."""
    return x / np.sqrt(np.mean(x ** 2))


def scene():
    """Jet, hum, pops, thumps, strikes and rumble over quiet outdoor air."""
    spin_hz, fourth_db, side_db = curves(SPIN)
    turn = 2 * np.pi * np.cumsum(spin_hz) / SR  # angle of the spin, in radians
    centre = hum(turn, fourth_db, side_db) + pops() + thumps()
    centre = centre * undb([[-.4], [.4]])  # a touch louder on the right
    return jet(turn) + centre + strikes() + rumble(turn) + air()


def record(dry):
    """The camera rounds the highest peaks and cuts the top."""
    rounded = np.tanh(.8 * dry) / .8
    top_cut = signal.ellip(12, .2, 75, TOP_HZ, fs=SR, output="sos")
    return signal.sosfilt(top_cut, rounded)


dry = scene()
out = record(dry)
file_out(out)
```